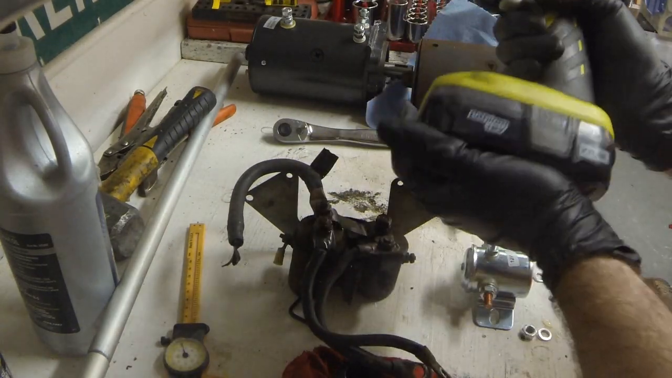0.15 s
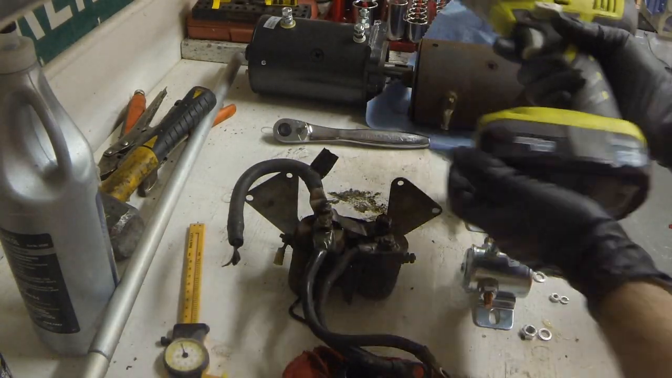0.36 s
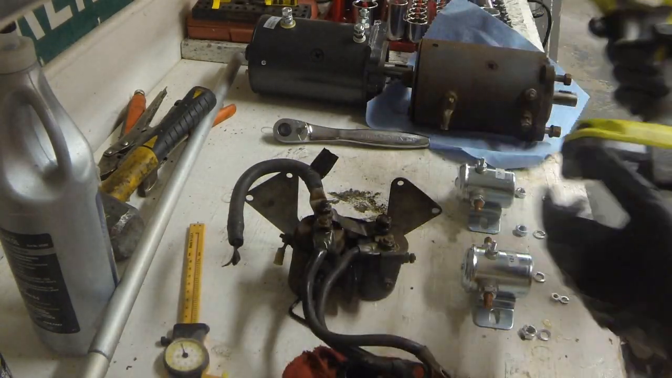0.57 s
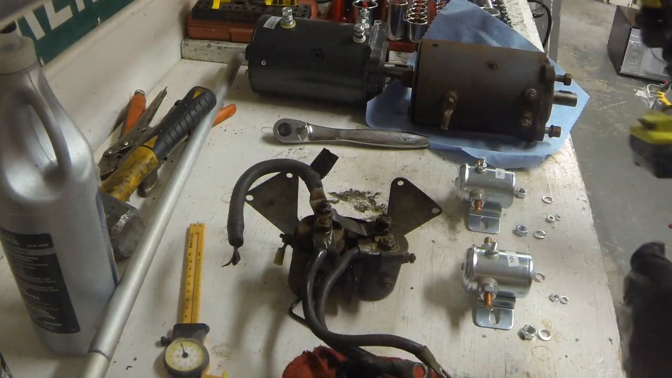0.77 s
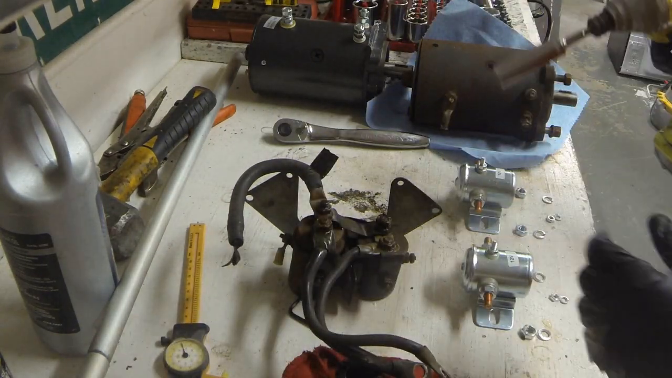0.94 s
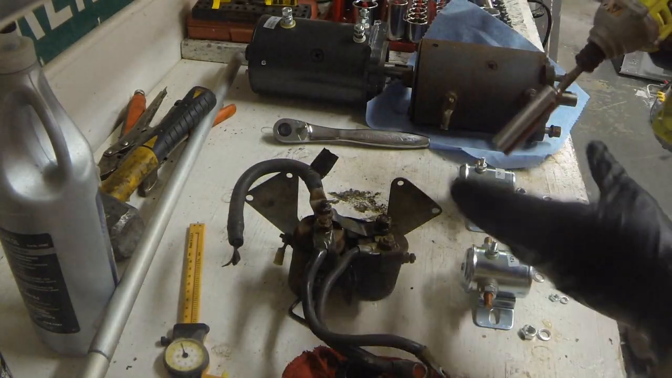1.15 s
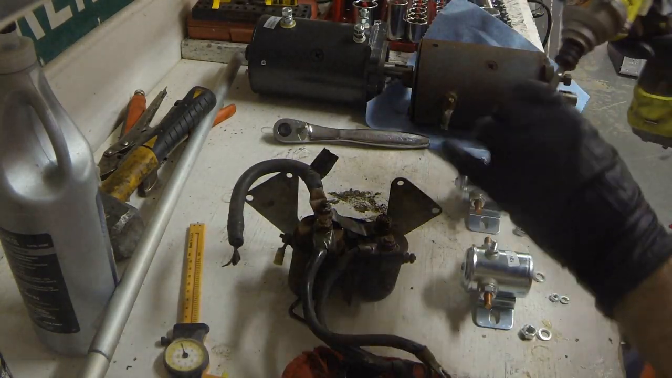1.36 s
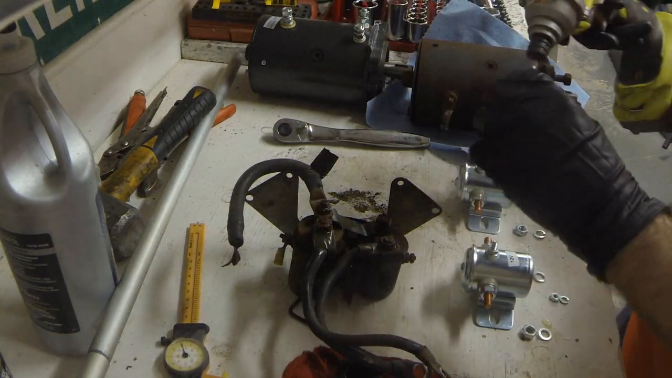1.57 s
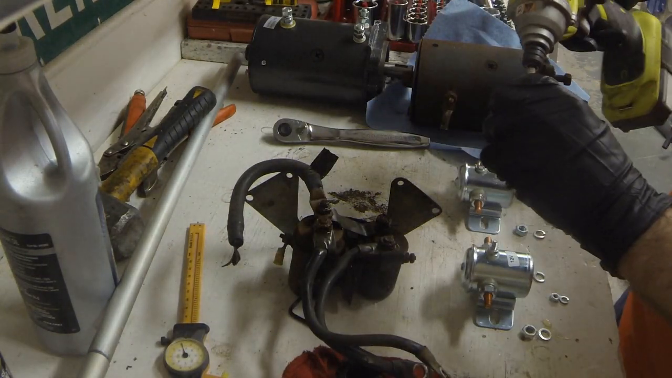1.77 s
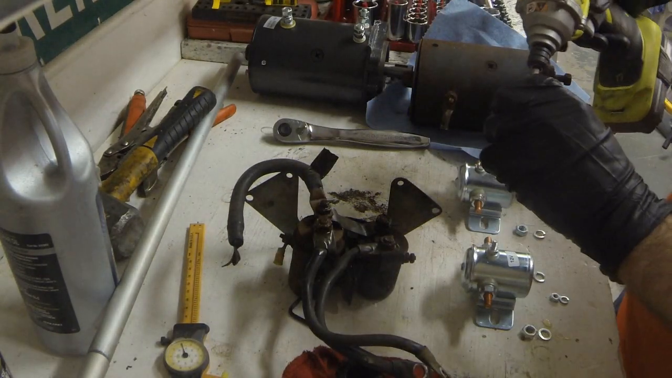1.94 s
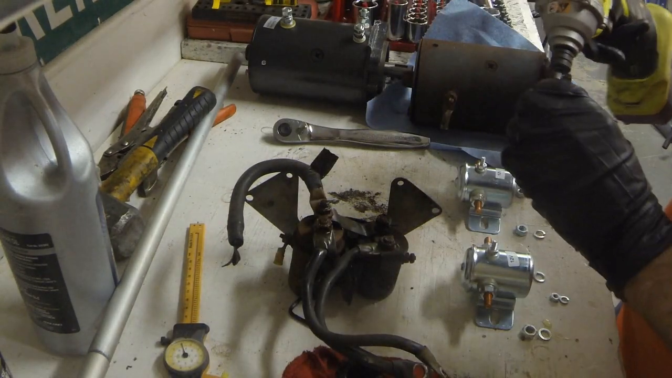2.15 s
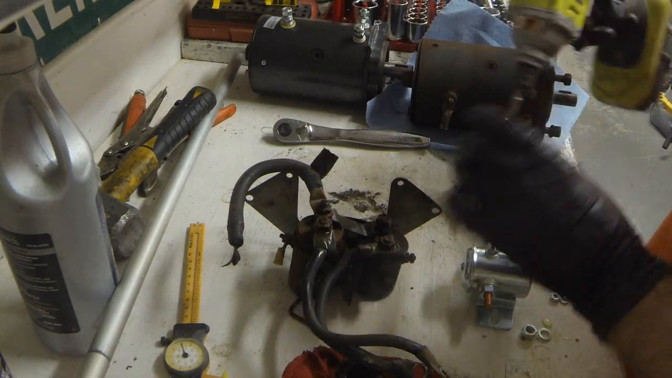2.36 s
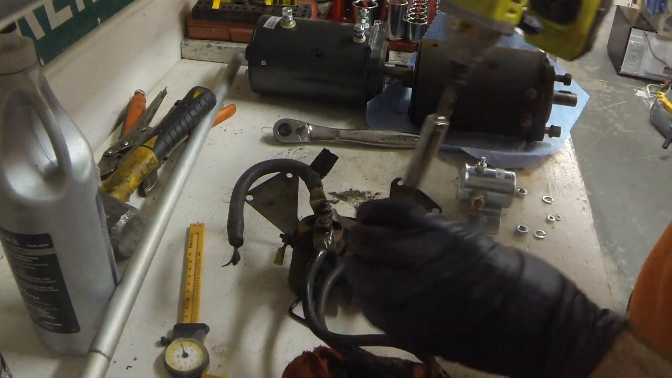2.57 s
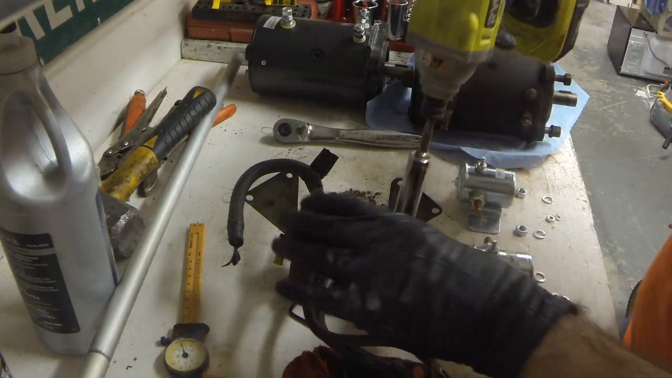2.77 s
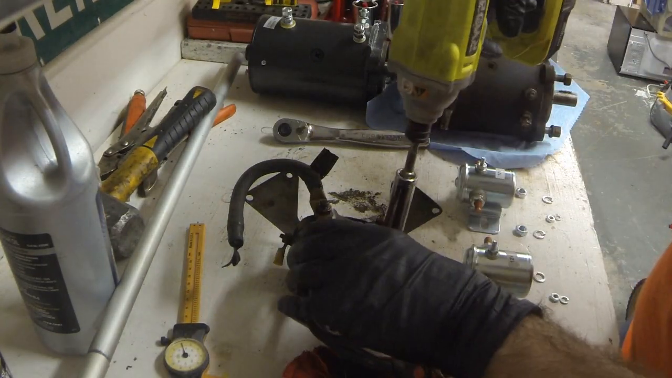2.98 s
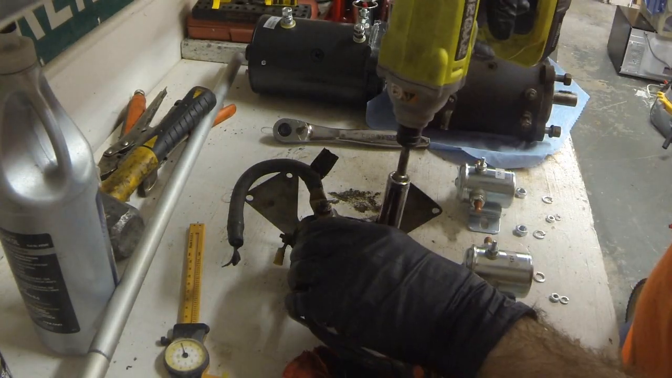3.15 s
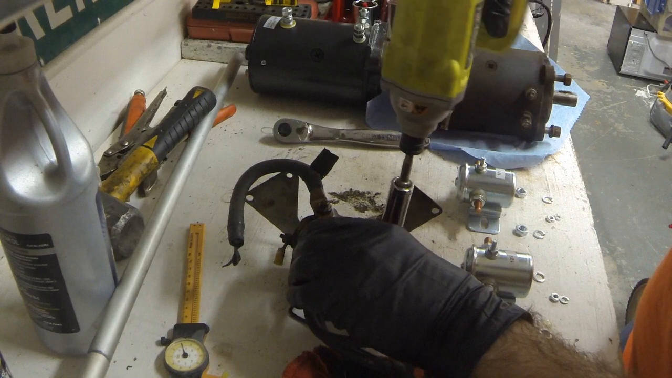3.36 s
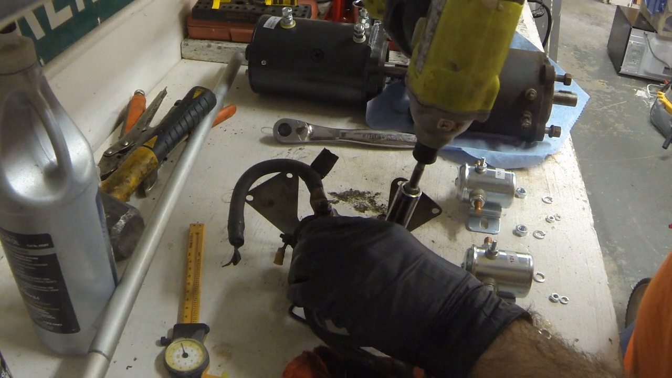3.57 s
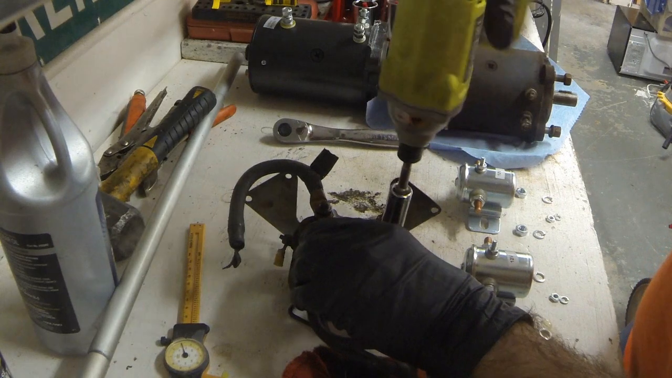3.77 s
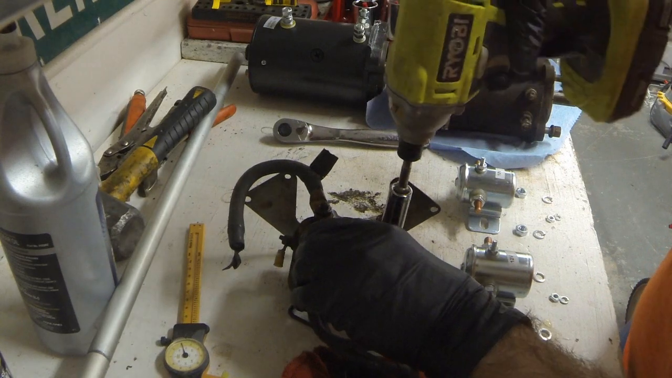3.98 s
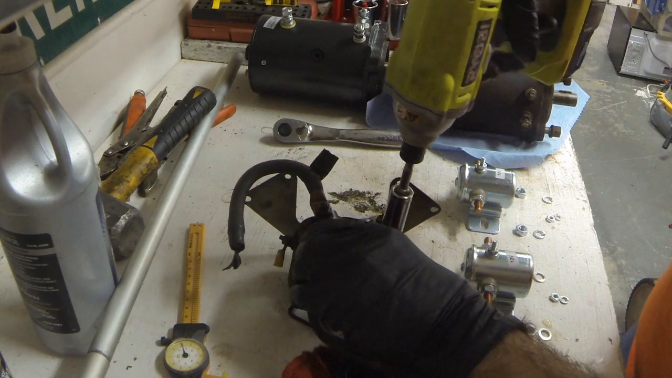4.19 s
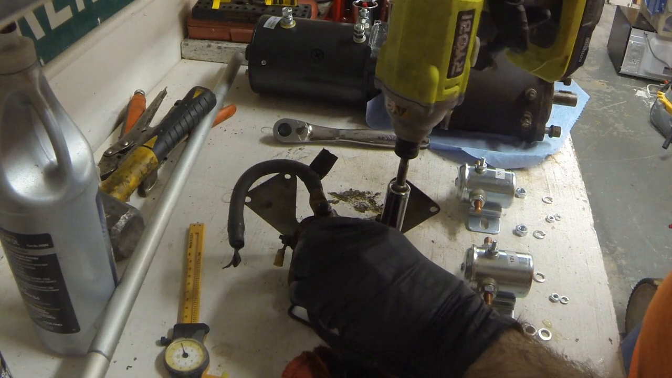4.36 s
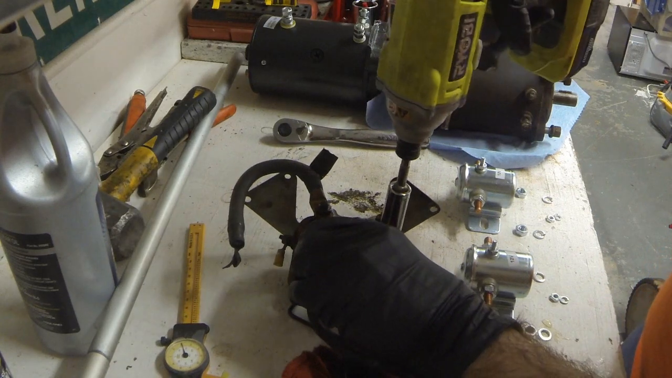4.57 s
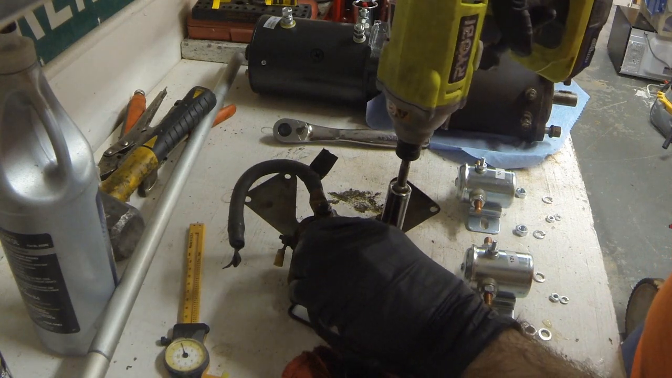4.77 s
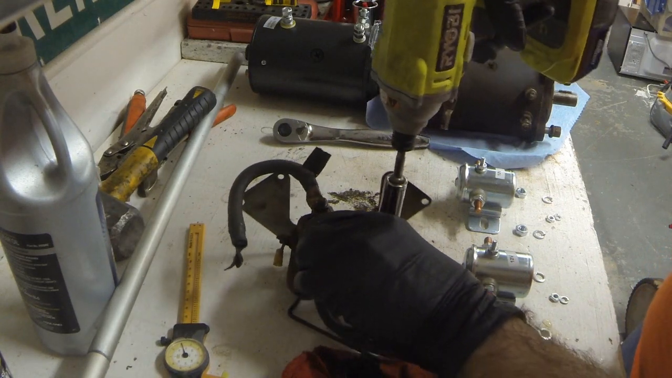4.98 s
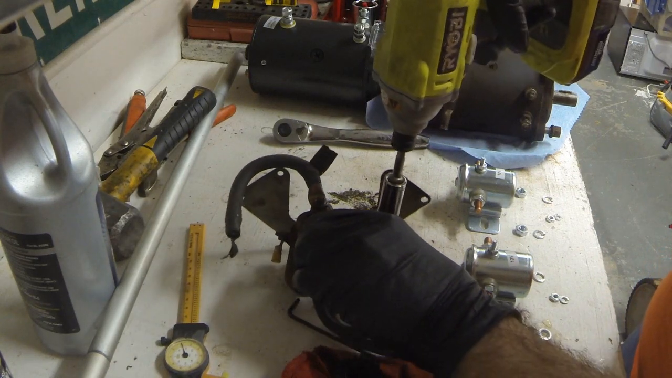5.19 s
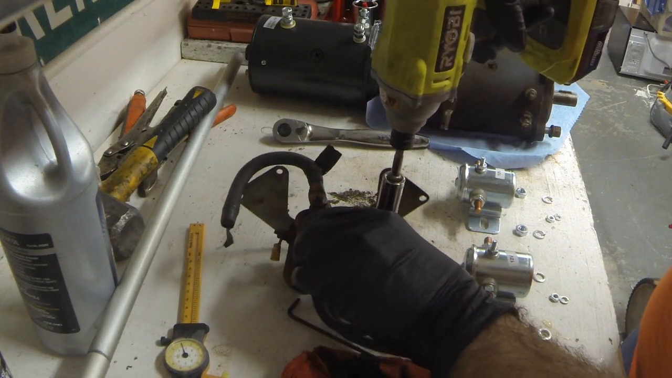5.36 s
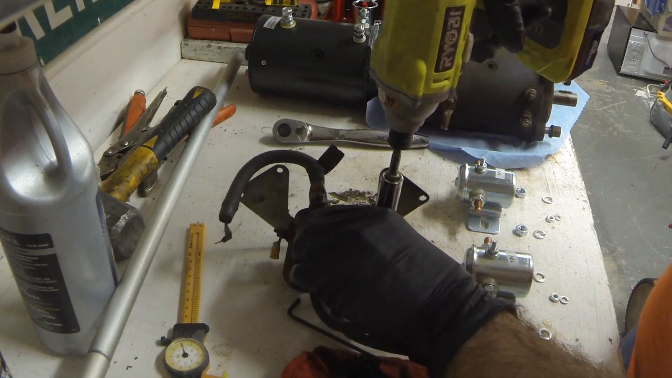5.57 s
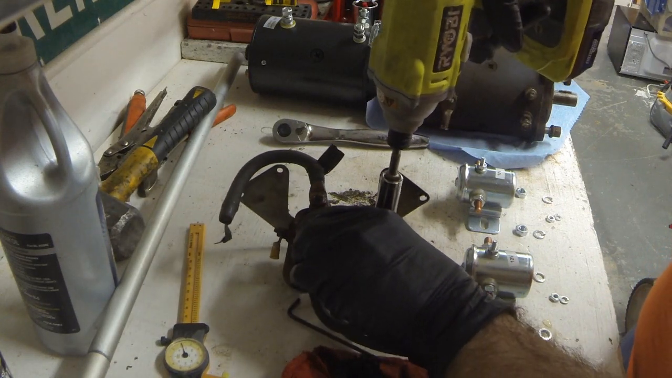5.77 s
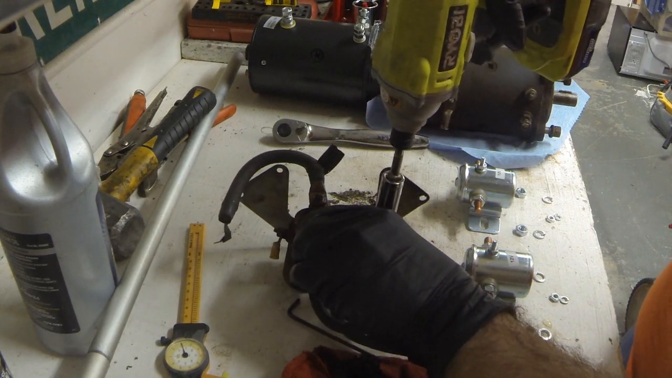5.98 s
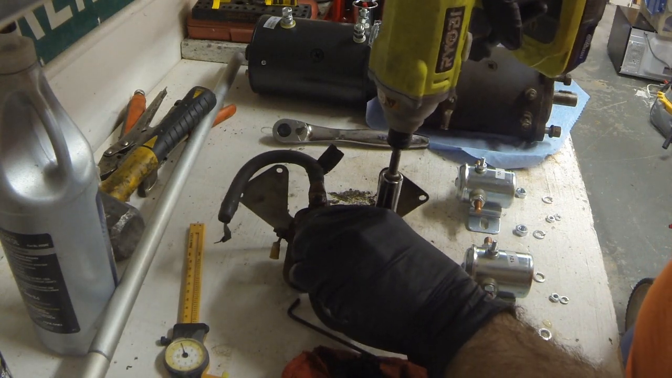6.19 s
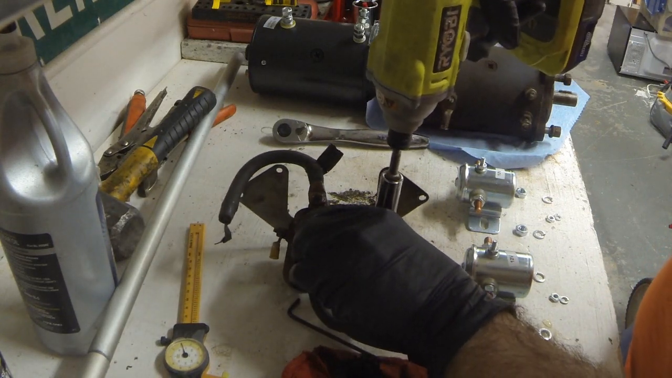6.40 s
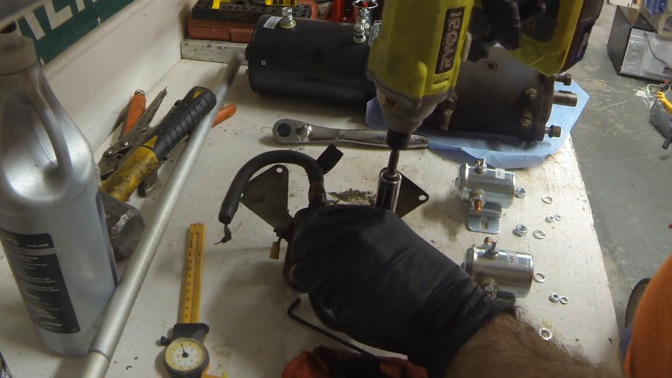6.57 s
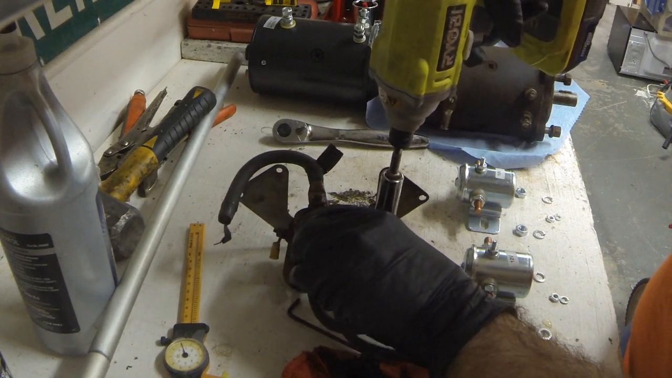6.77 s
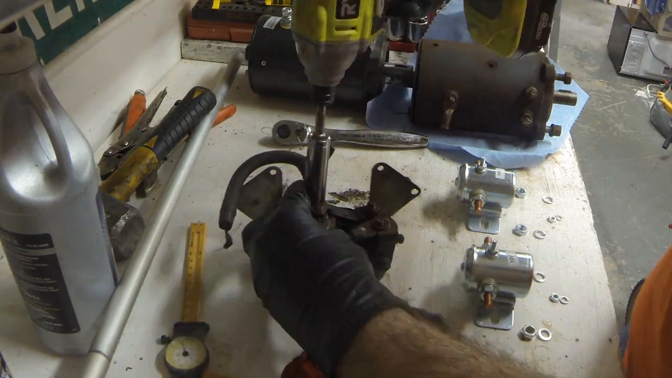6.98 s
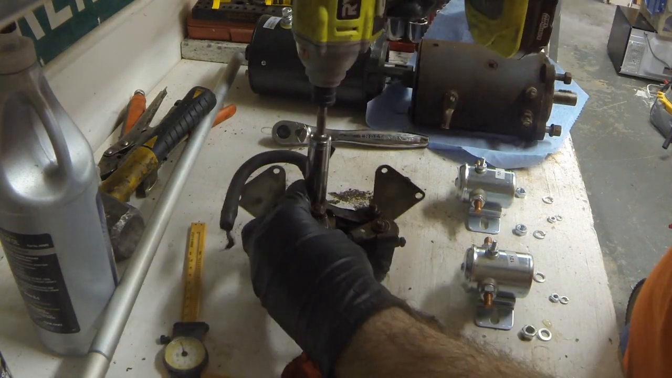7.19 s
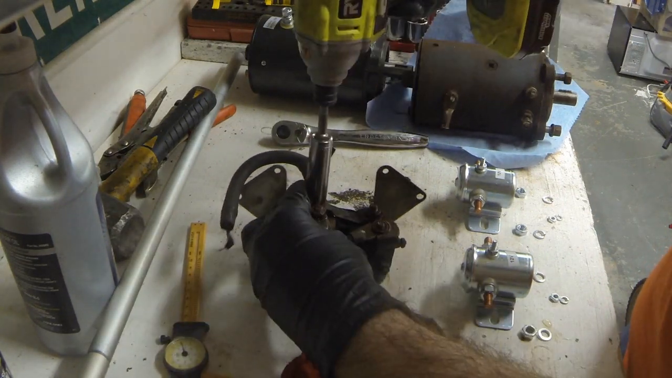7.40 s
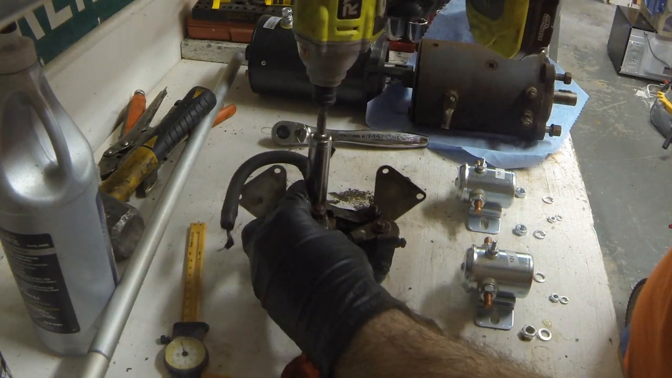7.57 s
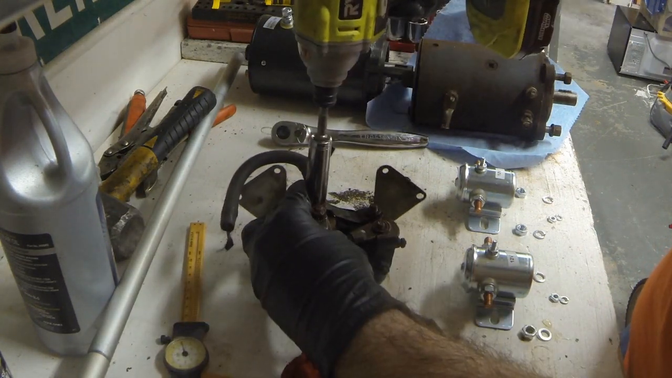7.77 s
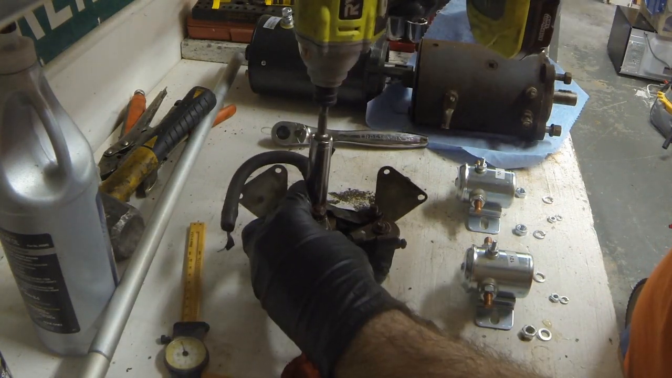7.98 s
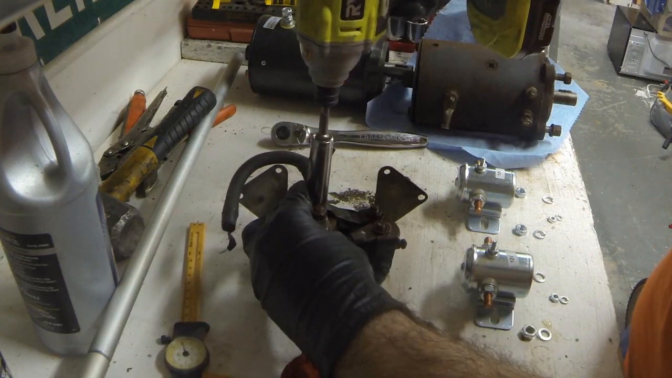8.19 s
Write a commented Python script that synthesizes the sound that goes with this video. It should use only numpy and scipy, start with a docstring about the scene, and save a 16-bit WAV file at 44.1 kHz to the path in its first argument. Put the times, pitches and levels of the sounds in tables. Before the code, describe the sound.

A battery latch snaps, gloves brush and a tool knocks about, then an impact driver hammers one loud burst, whirrs, and rattles through a steadier second burst.

```python
"""A cordless impact driver loosens bolts of a cast part held on a wooden workshop bench, heard from close by.
Shaped noise and steel modes make the hammer blows, rebounds and gear whirr; sines make the shaft and trigger
tones. Each blow rocks the part; bumps, lurches and the running motor shake the bench modes. Gloved hands brush
(coloured grains), the tool knocks about and a battery latch snaps. Mains hum and dull room noise lie beneath."""
import sys
import numpy as np
from scipy import signal
from scipy.fft import rfft, irfft
from scipy.io import wavfile
from scipy.ndimage import uniform_filter1d

SR = 44100
rng = np.random.default_rng(int(sys.argv[2]) if len(sys.argv) > 2 else 0)


def file_out(sig):
    """Save sig as 16-bit WAV at sys.argv[1]."""
    # one column per channel
    cols = np.atleast_2d(sig).T
    # limit, then scale
    lim = np.clip(cols, -1, 1)
    pcm = np.round(lim * 32767).astype(np.int16)
    wavfile.write(sys.argv[1], SR, pcm)


N = 363384
T = np.arange(N) / SR

# hammer on anvil: (time [s], blow level [dB], rebound level [dB])
BLOWS = [(4.9147, -7, -20.5), (5.002, -13, -18.5), (5.0823, -9.5, -23), (5.1662, -8.5, -19),
         (5.2502, -10, -21), (5.327, -12.5, -26), (5.3941, -11.5, -53), (5.459, -14, -34),
         (6.993, -16, -17.5), (7.042, -20, -24), (7.0935, -20, -20.5), (7.14, -19.5, -19.5),
         (7.1871, -17.5, -21), (7.2372, -18.5, -21), (7.2953, -23, -16), (7.3439, -22, -23),
         (7.3896, -23, -23), (7.438, -20.5, -23), (7.4843, -20.5, -24), (7.5364, -20.5, -19),
         (7.5839, -18.5, -22.5), (7.6318, -22, -18), (7.6788, -19, -20), (7.7244, -19, -20.5),
         (7.7757, -18.5, -19), (7.822, -21, -20), (7.8659, -27, -21), (7.9081, -21.5, -24),
         (7.9557, -20, -22), (7.9956, -20.5, -24), (8.0427, -20, -34), (8.0807, -33, -23),
         (8.1235, -29, -19.5), (8.1669, -21, -21.5), (8.2106, -25, -20.5)]
# grip on each bolt: (from time [s], clank over the crack [dB], thud level [dB], rocking level [dB],
# rattle level before the next blow [dB], fall of the rattle [dB/s])
BOLTS = [(4.9, -2.5, -11, -15.5, -19, 21), (6.9, 10.5, -16.5, -11, -35.5, -4.5)]
# tone colour of blows on the part: (frequency [Hz], density [dB per Hz])
BLOW_COLOUR = [(150, -33), (250, -2), (468, 0.5), (662, -5.5), (1040, -1.5), (1200, -5.5), (1530, -2),
               (2200, -15.5), (3400, -12), (5930, -26), (10200, -28.5), (14200, -40), (16000, -50)]
# ringing of part and socket: (frequency [Hz], level [dB], t60 [s])
STEEL_MODES = [(850, 0, .03), (1055, 0, .03), (1510, 3, .03), (1860, -2, .03), (2910, 0, .02),
               (3290, 2, .02), (4120, 0, .015), (4700, 0, .015), (5450, 3, .008), (6500, 3, .008),
               (8200, 5, .005), (10100, 6, .004)]
# the part held down on the bench, rocking: (frequency [Hz], level [dB], t60 [s])
ROCKING_MODES = [(126, -3.5, .15), (170, .5, .14), (190, -.5, .13)]
# motor running: (start [s], trigger off [s], whirr level [dB], clank level [dB], thud level [dB],
# bench shake level [dB], spin-up [dB/s], coast [dB/s], easing of treble [dB/s], easing of bass [dB/s],
# shaft tone level [dB])
RUNS = [(4.665, 4.74, -39.5, -37.5, -32.5, -52, 500, 183, 2, -9, -80),
        (4.851, 5.44, -28.5, -22.5, -20.5, -14.5, 406, 500, 15.5, 8, -72),
        (5.472, 5.775, -35.5, -34, -34.5, -25, 905, 420, -1, 6, -39),
        (5.965, 6.628, -29.5, -34.5, -30, -23, 497, 330, 11, 6.5, -35.5),
        (7, 8.3, -35, -29.5, -28, -29, 899, 399, 0.1, 3, -80)]
# the loose bolt lurches and shakes the part: (time [s], thud level [dB], bench shake level [dB])
LURCHES = [(5.48, -37, -23), (5.77, -44, -39), (5.85, -41.5, -27.5), (6.035, -40, -12),
           (6.085, -27.5, -15.5), (6.31, -41, -18), (6.446, -26, -18.5), (6.568, -44, -37)]
# tone colour of gearbox and fan: (frequency [Hz], density [dB per Hz])
GEAR_COLOUR = [(150, -30.5), (250, -5), (414, -1.5), (651, -9), (1060, -3), (1160, -11.5), (1420, -9.5),
               (2240, -13), (2600, -22), (2960, -11), (5800, -24.5), (8400, -26.5), (11000, -32.5),
               (14200, -38.5), (16000, -53.5)]
# tones of the shaft: (multiple of the shaft rate [1], level [dB])
SHAFT_ORDERS = [(3, 3), (4, -2), (5, -4), (6, -13), (8, -14), (10, -17)]
# speed switch chopping the current, and short pings as the motor breaks loose: (start [s], end [s], # start
# pitch [Hz], middle pitch [Hz],
WHINES = [(4.518, 4.683, 5380, 5800, 5340, -59), (4.673, 4.695, 3800, 3580, 3440, -47),
          (4.679, 4.743, 4540, 4800, 5270, -45), (4.747, 4.865, 5160, 5230, 5100, -47.5),
          (5.927, 5.97, 5700, 5540, 5500, -55.5), (5.966, 5.99, 3650, 3830, 3940, -42)]
# tool and socket handled and bumped, and a few lurches of the loose bolt while the motor runs: # (time [s],
# level [dB], brightness [dB per band], bench level [dB])
KNOCKS = [(0.0088, -34.5, -10.5, -50), (0.6222, -43.5, 6, -62), (0.841, -39.5, 1, -58),
          (1.068, -49, 3.5, -62), (1.172, -50, -13, -49), (1.3261, -55, 6, -64), (1.474, -54, 6, -60),
          (1.8245, -35, 6.5, -56), (1.9752, -37.5, 4.5, -52), (2.2526, -45, -3, -51.5),
          (2.2652, -41.5, 3, -54), (2.418, -48, -4, -56), (2.9117, -36.5, -15, -32),
          (2.9403, -35.5, -4.5, -19), (2.974, -39, -13, -47), (2.99, -36.5, -5.5, -36),
          (3.012, -35.5, -16.5, -34), (3.091, -31.5, -8.5, -19.5), (3.1399, -23, -6.5, -23),
          (3.4565, -48.5, -4, -36), (3.5808, -49, 3, -42), (3.64, -48.5, -16, -46),
          (3.7122, -16.5, -11, -9.5), (3.9377, -47, -1, -64), (4.523, -48, 0, -62), (4.7153, -29.5, 0, -40),
          (4.7406, -40, -18, -33), (4.8635, -15.5, -7.5, -17.5), (5.546, -33, -11, -25),
          (5.6955, -29, -16, -17), (5.7289, -27, -2, -19.5), (6.191, -31.5, 8, -47), (6.6682, -50, 11, -60),
          (6.762, -32.5, -12, -40), (6.7903, -43, -6.5, -41.5)]
# tone colour of a hand-held tool bumping: (frequency [Hz], density [dB per Hz])
BUMP_COLOUR = [(150, -26), (250, -6.5), (380, -0.5), (640, -11.5), (802, -5.5), (1220, -15.5), (1910, -19),
               (4730, -28.5), (7000, -45), (10000, -41), (11700, -50), (16000, -70.5)]
# ringing of the wooden bench: (frequency [Hz], level [dB], t60 [s])
BENCH_MODES = [(45, -9, 0.24), (71.4, -2.5, 0.19), (99.5, 3, 0.24), (131, 7, 0.13), (175.6, 0.5, 0.13),
               (245, 0.5, 0.023), (315, -11.5, 0.11), (375.3, -10.5, 0.16), (485, -12.5, 0.041),
               (573.4, -13, 0.14), (782, -14, 0.13)]
# battery latch snapping shut close by: (frequency [Hz], level [dB], t60 [s])
LATCH_MODES = [(759, -2, .03), (931, 5, .017), (560, -26, .12), (2070, -12, .012), (3600, -20, .01)]
# gloves and sleeves brushing: (middle [s], length [s], level [dB])
GLOVES = [(0.066, .24, -53.5), (.33, 0.052, -60), (0.443, 0.092, -59.5), (.55, 0.089, -57),
          (0.71, 0.1, -51), (0.874, 0.094, -50), (1, 0.13, -51.5), (1.168, 0.16, -47.5), (1.75, 0.14, -50),
          (2.325, 0.18, -54), (2.562, 0.092, -56), (2.8, .4, -68), (3.48, 0.11, -63)]
# tone colour of cloth: (frequency [Hz], density [dB per Hz])
CLOTH_COLOUR = [(200, -20), (800, 1), (1800, 5), (4500, -5), (7000, -19.5), (10000, -17), (16000, -32)]
# tone colour of the room noise: (frequency [Hz], density [dB per Hz])
ROOM_COLOUR = [(12, -55), (20, -2), (68, -7), (102, -2), (128, -10.5), (172, -19), (472, -26.5),
               (720, -27.5), (810, -20.5), (900, -26), (1260, -35.5), (1860, -35), (2400, -41.5),
               (3100, -40), (7500, -58), (10000, -54.5), (13900, -66), (16000, -86)]
# hum and room noise swell in at first: (time [s], level [dB])
FADE_UP = [(0, -7), (.13, 1), (.36, 3), (.75, 8)]
# spread from blow to blow: (clank [dB], thud [dB], rocking [dB], rattle [dB])
SCATTER_DB = (2.5, 1.05, 1.37, 3.6)

REBOUND_SHARE, RATTLE_SHARE = 0.211, 0.82  # of the time to the next blow
CRACK_TILT = 1.16  # brightness moves the top band more than the bottom one
SCUFF_T60_S, SCUFF_S_PER_DB = 0.09, 0.0019  # at -35 dB; harder knocks scuff longer
SPIN_FROM_DB = -25.5  # level at the first touch of the trigger
SHAFT_HZ, SHAFT_SAG_HZ_PER_DB = 352, 2  # the shaft is slow while spinning up and coasting
LURCH_S = 0.013
OCTAVE_DB = -12  # of the whine, under its base tone
HUM_HZ, HUM_DB = 120, -42  # level before the fade-up
ROOM_DB, RUSTLE_DB = -45.5, -69.5  # room noise before the fade-up; lowest cloth rustle
SHOP_T60_S, SHOP_DB = 0.3, -15
SPLIT_HZ, TOP_HZ = (900, 2750), 15600  # band edges of the gritty noise; top of the output


def hammer_blows():
    """Hammer strikes and rebounds: loudness of crack, clank and thud, and the twisting force on the part."""
    lines, kick = np.zeros((3, N)), np.zeros(N)
    gaps = np.diff(np.transpose(BLOWS)[0])
    last = np.append(gaps > 0.2, False)  # a blow with a pause after it
    gaps = np.append(np.where(last[:-1], np.roll(gaps, 1), gaps), gaps[-1])  # pauses take the gap before
    chance = rng.standard_normal((len(BLOWS), 5))
    for (s, crack_db, rebound_db), gap, stops, luck in zip(BLOWS, gaps, last, chance):
        since, *bolt, fall = [row for row in BOLTS if row[0] < s][-1]
        over_db, thud_db, rock_db, rattle_db = bolt + luck[:4] * SCATTER_DB
        rattle_db -= fall * (s - since)
        add(lines[0], s, chatter(crack_db, 0.051, 0.53))
        add(lines[1], s, chatter(crack_db + over_db, 0.029, -13.0))
        add(lines[2], s, chatter(thud_db, 0.1, 0.95))
        # the hammer climbs its cam, twists the part and lets go
        twist = undb(rock_db) * push(3.1)
        add(kick, s - 0.006, -twist)
        add(kick, s - 0.003, twist)
        # rebound, then socket slack rattling unless the blows pause here
        returns = [(REBOUND_SHARE, rebound_db)]
        if not stops:
            returns.append((RATTLE_SHARE, rattle_db))
        for share, db in returns:
            clank_db = db + 7.5 + SCATTER_DB[0] * luck[-1]
            add(lines[0], s + share * gap, chatter(db, 0.095, 0.47))
            add(lines[1], s + share * gap, chatter(clank_db, 0.047, -5.5))
    return lines, kick


def motor():
    """Loudness of gear whirr in three throbbing bands, the shaking passed to the bench, and the shaft tones."""
    lines, tones = np.zeros((4, N)), 0
    for start, off, *dbs, rise, coast, treble_ease, bass_ease, tone_db in RUNS:
        spin_up_db = np.minimum(SPIN_FROM_DB + rise * (T - start), 0)
        lag_db = spin_up_db - coast * np.maximum(T - off, 0)
        eases = (treble_ease, treble_ease, bass_ease, bass_ease)
        ease_db = np.outer(eases, np.maximum(T - start, 0))
        running = undb(lag_db) * (T > start)
        lines += undb(np.array(dbs)[:, None] - ease_db) * running
        if tone_db > -60:  # weaker shaft tones are left out
            hz = SHAFT_HZ + SHAFT_SAG_HZ_PER_DB * np.maximum(lag_db, -40)
            tones = tones + shaft(hz, running * undb(tone_db - ease_db[0]))
    for s, *dbs in LURCHES:
        lines[2:] += undb(np.array(dbs))[:, None] * hump(s, LURCH_S)
    throb_db = np.array([2.4 * walk(40), 3.2 * walk(30), 3.9 * walk(30), 1.0 * walk(30)])
    whirr_and_shake = lines * undb(throb_db)
    return whirr_and_shake[:3], whirr_and_shake[3], tones


def shaft(hz, loudness):
    """Turning shaft: sines on multiples of its unsteady rate, coming and going."""
    turn = 2 * np.pi * np.cumsum(hz * (1 + 0.016 * walk(40) + 0.021 * walk(7.2))) / SR
    return loudness * sum(undb(db + 5.4 * walk(22)) * np.sin(k * turn) for k, db in SHAFT_ORDERS)


def trigger_whine():
    """Chopped current sings in the windings: a thin wavering tone and its octave; short pings as the motor
    breaks loose."""
    out = 0
    for start, end, *path_hz, db in WHINES:
        gate = uniform_filter1d(1.0 * ((T > start) & (T < end)), size=200)
        hz = np.interp(T, (start, (start + end) / 2, end), path_hz)
        phase = 2 * np.pi * np.cumsum(hz * (1 + 0.016 * walk(300))) / SR
        tone = np.sin(phase) + undb(OCTAVE_DB) * np.sin(2 * phase)
        out = out + gate * np.sqrt(2) * undb(db + 4.2 * walk(55)) * tone
    return out


def tool_knocks():
    """Tool and socket bumped about, and some lurches of the loose bolt: loudness of top, middle and bottom, and
    the short force on the bench."""
    lines, force = np.zeros((3, N)), np.zeros(N)
    for s, db, bright_db, bench_db in KNOCKS:
        scuff_t60 = SCUFF_T60_S + SCUFF_S_PER_DB * (db + 35)
        for line, side in zip(lines, (CRACK_TILT, 0, -1)):
            add(line, s, chatter(db + side * bright_db, scuff_t60, -2.23))
        add(force, s, undb(bench_db) * push(0.33))
    return lines, force


def bench_and_part(force, shake, kick):
    """Bench modes rung by bumps and motor shaking, and the held part rocked by the twist of each blow."""
    shaking = rng.standard_normal(N)
    shaken = ring(shaking * shake, BENCH_MODES) / np.std(ring(shaking, BENCH_MODES))
    return ring(force, BENCH_MODES) + shaken + ring(kick, ROCKING_MODES, facing=0.9)


def battery_latch():
    """Latch snapping shut at the very start: one impulse rings its modes."""
    snap = np.zeros(N)
    snap[0] = 1
    return ring(snap, LATCH_MODES)


def glove_rustle():
    """Cloth brushing: uneven noise grains in a cloth colour swell with each stroke."""
    brushing = undb(RUSTLE_DB) + sum(undb(db) * hump(s, length / 4) for s, length, db in GLOVES)
    grains = rng.standard_normal(N) * undb(2.2 * walk(36) + 2.8 * rng.exponential(size=N))
    return unit(colour(grains, CLOTH_COLOUR)) * brushing


def shop_echo(dry):
    """Workshop reverb: decaying dull noise as the impulse response, starting after 4 ms."""
    t = T[:SR // 2]
    dull = signal.lfilter([1], [1, -0.6], rng.standard_normal(len(t)))
    echoes = dull * undb(-60 * t / SHOP_T60_S) * (t > 0.004)
    return undb(SHOP_DB) * signal.fftconvolve(dry, echoes / np.linalg.norm(echoes))[:N]


def hum_and_room():
    """Mains hum as one sine and dull coloured room noise, both drifting in level and swelling in at first."""
    hum = undb(HUM_DB + 0.27 * walk(4.1)) * np.sqrt(2) * np.sin(2 * np.pi * HUM_HZ * T)
    air = unit(colour(rng.standard_normal(N), ROOM_COLOUR)) * undb(ROOM_DB + 1.4 * walk(3.29))
    return (hum + air) * undb(np.interp(T, *np.transpose(FADE_UP)))


def gritty(lines, points, modes):
    """Gritty coloured noise: three loudness lines play its top, middle and bottom, and ring the modes there."""
    out = 0
    bands = ((SPLIT_HZ[1], "high"), (SPLIT_HZ, "band"), (SPLIT_HZ[0], "low"))
    for loudness, (hz, kind) in zip(lines, bands):
        sos = signal.butter(2, hz, kind, fs=SR, output="sos")
        grit = rng.standard_normal(N) * undb(1.77 * rng.exponential(size=N))
        plain = np.std(signal.sosfilt(sos, colour(grit, points)))
        noise = signal.sosfilt(sos, colour(grit * loudness, points)) / plain
        near = [m for m in modes if kind == ("low", "band", "high")[np.searchsorted(SPLIT_HZ, m[0])]]
        out = out + noise + undb(-51.5) * ring(noise, near, wander_db=6.5)
    return out


def chatter(db, t60, tail_db):
    """Loudness of a contact: quick rise and fall, with a longer scuff after it."""
    t = T[:SR // 3]
    rise = 1 - np.exp(-t / 0.00089)
    fall = 1.066 * undb(-60 * t / 0.017)
    scuff = undb(tail_db - 60 * t / max(t60, 0.02))
    return undb(db) * rise * (fall + scuff)


def push(ms):
    """Half-sine force of unit area."""
    force = np.sin(np.pi * np.arange(0, 1, 1000 / (ms * SR)))
    return force / force.sum()


def ring(x, modes, wander_db=0.0, facing=-1):
    """Sum of decaying modes, each facing times the one before (-1 alternates phase); strengths may wander."""
    out = 0
    for k, (hz, db, t60) in enumerate(modes):
        pole = np.exp(2j * np.pi * hz / SR - np.log(1000) / (max(t60, 0.003) * SR))
        strength = undb(db + (wander_db * walk(20) if wander_db else 0))
        out = out + facing ** k * strength * signal.lfilter([1], [1, -pole], x).imag
    return out


def colour(x, points):
    """Causal filter through (frequency [Hz], level [dB]) points, from the cepstrum of the log gain."""
    hz, db = np.transpose(points)
    grid_hz = np.linspace(1, SR / 2, 4097)
    log_gain = np.interp(np.log(grid_hz), np.log(hz), db) * np.log(10) / 20
    cep = irfft(log_gain)
    # fold the cepstrum to one side: minimum phase
    cep[1:4096] *= 2
    cep[4097:] = 0
    return signal.fftconvolve(x, irfft(np.exp(rfft(cep))))[:N]


def walk(rate):
    """Random levels held 1 / rate s and slewed twice; spread near 1."""
    k = int(SR / rate)
    steps = np.repeat(rng.standard_normal(N // k + 1), k)
    return 1.5 * uniform_filter1d(uniform_filter1d(steps, k), k)[:N]


def hump(s, width):
    """Bell-shaped swell around time s."""
    return np.exp(-0.5 * np.minimum(((T - s) / width) ** 2, 100))


def add(line, s, shape):
    """Lay a shape on a line at time s."""
    i = min(max(int(s * SR), 0), N)
    line[i:i + len(shape)] += shape[:N - i]


def undb(db):
    """Decibels to amplitude factor."""
    return np.exp(np.asarray(db) * (np.log(10) / 20))


def unit(x):
    """Scale to an RMS of 1."""
    return x / np.sqrt(np.mean(x ** 2))


def scene():
    """Driver, knocks and bench with their echo; latch, rustle, hum and room noise are added without echo."""
    blows, kick = hammer_blows()
    whirr, shake, tones = motor()
    knocks, force = tool_knocks()
    driver = gritty(blows, BLOW_COLOUR, STEEL_MODES) + gritty(whirr, GEAR_COLOUR, STEEL_MODES)
    driver = driver + tones + trigger_whine()
    dry = driver + gritty(knocks, BUMP_COLOUR, STEEL_MODES) + bench_and_part(force, shake, kick)
    return (dry + shop_echo(dry) + battery_latch() + glove_rustle() + hum_and_room())[None]


def record(dry):
    """A small camera rounds the loudest peaks (tanh) and cuts the top (steep low-pass)."""
    rounded = np.tanh(0.64 * dry) / 1.054
    return signal.sosfilt(signal.ellip(8, 0.2, 70, TOP_HZ, fs=SR, output="sos"), rounded)


dry = scene()
out = record(dry)
file_out(out)
```